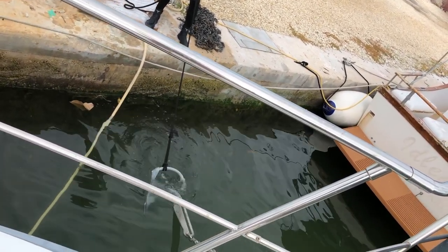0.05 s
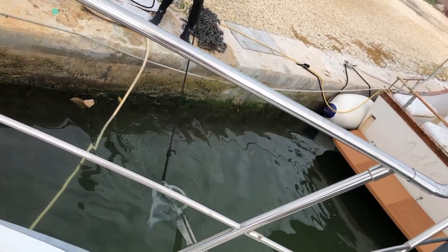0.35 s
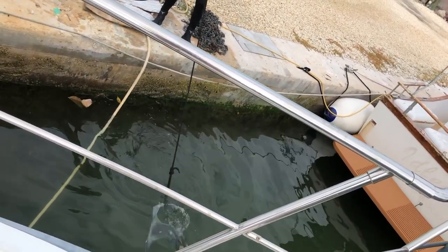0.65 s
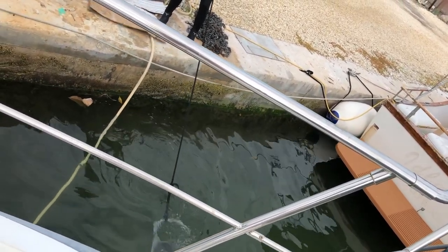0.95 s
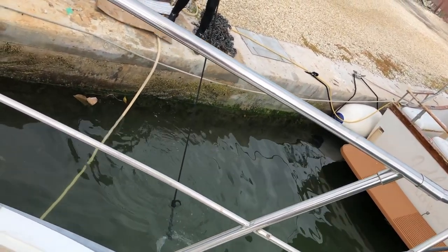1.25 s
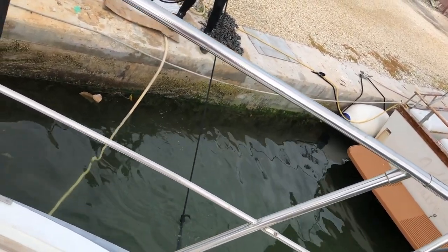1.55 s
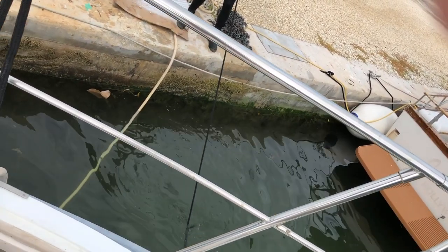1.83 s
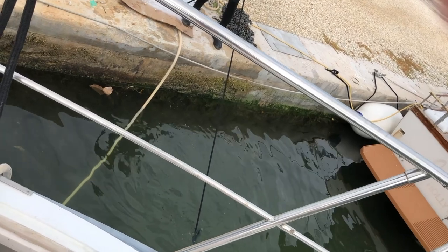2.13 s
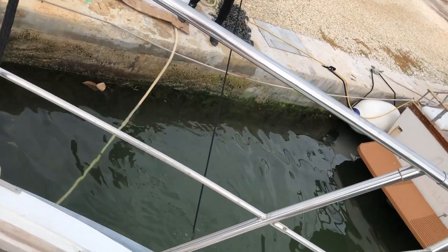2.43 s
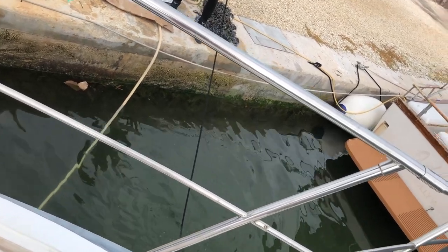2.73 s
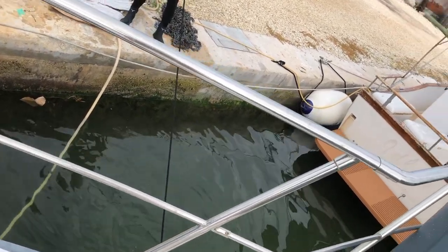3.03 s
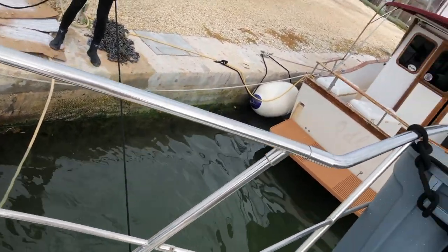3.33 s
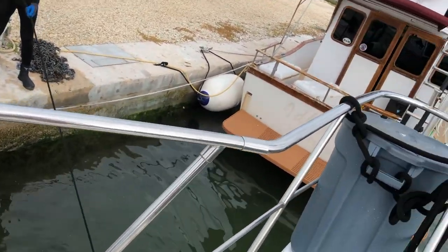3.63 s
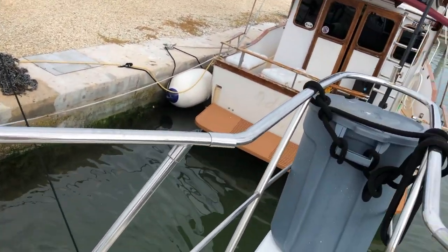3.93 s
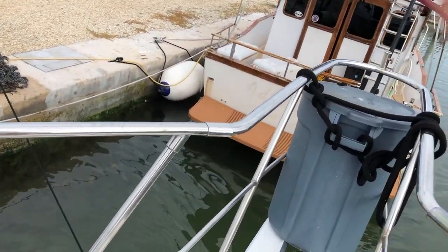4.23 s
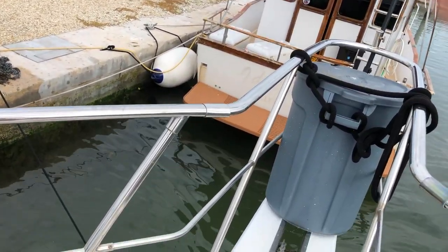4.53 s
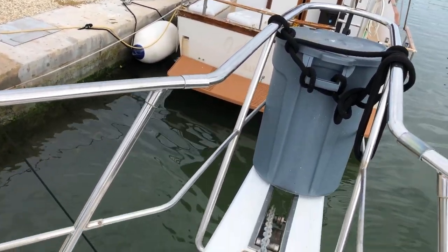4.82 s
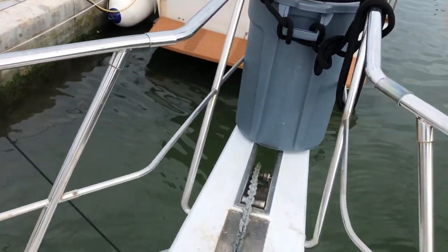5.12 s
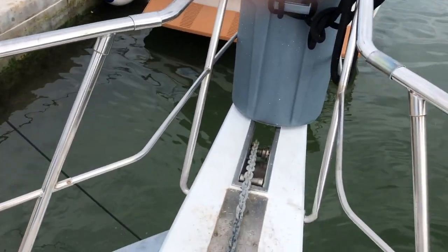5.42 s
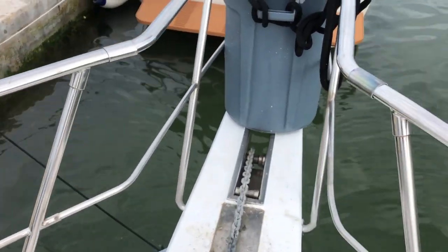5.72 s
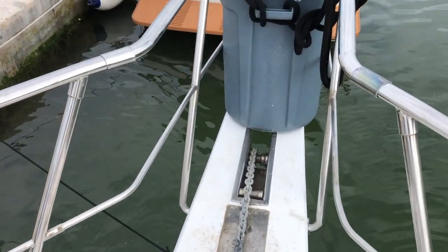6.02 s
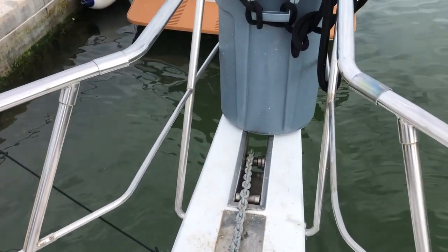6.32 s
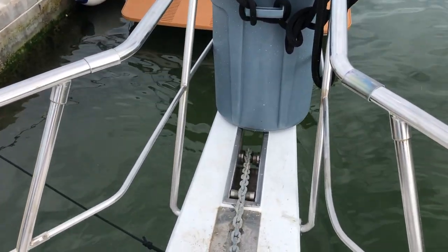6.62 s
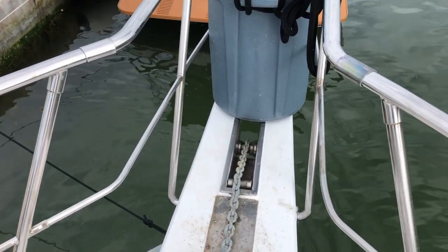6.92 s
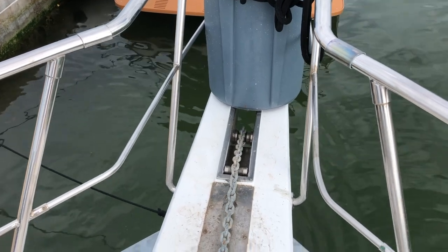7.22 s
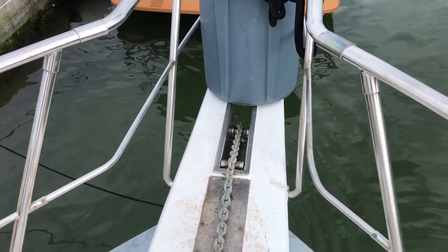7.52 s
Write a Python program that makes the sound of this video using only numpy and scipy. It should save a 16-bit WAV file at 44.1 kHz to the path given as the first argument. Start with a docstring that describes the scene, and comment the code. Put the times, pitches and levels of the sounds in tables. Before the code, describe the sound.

Anchor chain grinds and clatters over a boat's steel roller in three runs, with a low motor hum and rumbling deck.

```python
"""On the bow of a moored boat, one microphone close to an electric windlass paying out anchor chain.
Faint harbour noise lies far behind three runs: the first is already under way, the others start with
a clack. The motor hums, links hiss and grind round the drum, knock over the steel roller and set the
hollow deck rumbling. After each run the drive coasts down and the chain comes to rest."""
import sys
import numpy as np
from scipy import signal
from scipy.fft import rfft, irfft
from scipy.io import wavfile

SR = 44100
rng = np.random.default_rng(int(sys.argv[2]) if len(sys.argv) > 2 else 0)


def int16_out(signal):
    """Quantize to a 16-bit WAV file."""
    q = np.round(np.clip(np.atleast_2d(signal).T, -1, 1) * 32767)
    wavfile.write(sys.argv[1], SR, q.astype(np.int16))


N = 333396
TIME = np.arange(N) / SR


def from_db(db):
    """Decibels to gain."""
    return 10 ** (np.asarray(db) / 20)


def rms_one(x):
    """Scale to unit power."""
    return x / np.sqrt(np.mean(x ** 2) + 1e-20)


def drift(per_s):
    """A random wander through per_s new values a second; rms 1."""
    knots = rng.standard_normal(8192)
    return rms_one(np.interp(TIME * per_s, np.arange(len(knots)), knots))


def coloured(x, spectrum, size=8192):
    """Causal (minimum-phase) filter with the given spectrum; white noise keeps its power."""
    hz, db = np.transpose(spectrum)
    log_hz = np.log(np.maximum(np.arange(size // 2 + 1) * SR / size, 1))
    gain = from_db(np.interp(log_hz, np.log(hz), db))
    cepstrum = irfft(np.log(gain))
    cepstrum[1:size // 2] *= 2
    cepstrum[size // 2 + 1:] = 0
    response = irfft(np.exp(rfft(cepstrum)))
    return signal.fftconvolve(x, response / np.linalg.norm(response))[:N]


def resonance(x, hz, width_hz):
    """Two-pole resonance with gain 1 at its peak."""
    radius = np.exp(-np.pi * width_hz / SR)
    feedback = [1, -2 * radius * np.cos(2 * np.pi * hz / SR), radius ** 2]
    return signal.lfilter(np.array([1, 0, -1]) * (1 - radius ** 2) / 2, feedback, x)


def body(x, modes, tuning=1):
    """A solid body passes the sound on with a few modes standing out."""
    return x + sum(from_db(db) * resonance(x, hz * tuning, width) for hz, width, db in modes)


def dying(power, t60):
    """Each impulse of power decays by 60 dB in t60 seconds."""
    return signal.lfilter([1], [1, -from_db(-60 / (t60 * SR)) ** 2], power + 1e-18)


def chatter(times, level_db, rise_s, t60, tail_db, tail_t60):
    """A blow is a burst of tiny contacts that swells, dies fast and leaves a weaker shiver."""
    power = np.zeros(N)
    power[np.clip(np.round(times * SR).astype(int), 0, N - 1)] = from_db(level_db) ** 2
    envelope = np.sqrt(dying(power, t60) + from_db(tail_db) ** 2 * dying(power, tail_t60))
    lag = np.exp(-1 / (rise_s * SR))
    return signal.lfilter([1 - lag], [1, -lag], envelope) * rng.standard_normal(N)


def rattle(per_s, spread_db, t60, rub_db):
    """Many small contacts of uneven strength at random moments, over steady rubbing; rms 1."""
    contacts = rng.random(N) < per_s / SR
    strength = from_db(spread_db * np.clip(rng.standard_normal(N), -2, 2))
    power = dying(contacts * strength ** 2, t60)
    envelope = np.sqrt(power / power.mean() + from_db(rub_db) ** 2)
    return rms_one(envelope * rng.standard_normal(N))


def pings(times, level_db, low_hz, high_hz, t60, mode_count):
    """Each contact falls at another spot, so it wakes its own few short modes."""
    out = np.zeros(N + SR)
    age = np.arange(int(min(t60, .5) * SR)) / SR
    envelope = from_db(-60 * age / t60) * (1 - np.exp(-age * low_hz))
    for s, db, (pitch, phase) in zip(times, level_db, rng.random((len(times), 2, mode_count))):
        hz = low_hz * (high_hz / low_hz) ** pitch
        modes = np.sin(2 * np.pi * (hz[:, None] * age + phase[:, None])).sum(0)
        start = int(max(s, 0) * SR)
        out[start:start + len(age)] += from_db(db) * envelope * modes / np.sqrt(mode_count)
    return out[:N]


def jostle(low_hz, high_hz, t60, spread_db, count):
    """Loose links touch at random moments; rms 1."""
    moment, strength = rng.random((count, 2)).T
    return rms_one(pings(moment * TIME[-1], spread_db * strength, low_hz, high_hz, t60, mode_count=2))


# The harbour, far from the microphone. Each row: frequency in Hz, relative level in dB.
HARBOUR_SPECTRUM = [(15, -57), (25, -29), (46, -20), (69, -10), (86, -17.5), (243, -23.5), (335, -26),
                    (3010, -53), (8550, -49), (15000, -74)]

def harbour():
    """The distant harbour arrives as a faint, steady, low noise."""
    return from_db(-52.5) * coloured(rng.standard_normal(N), HARBOUR_SPECTRUM)


# The foredeck under the microphone. Each row: frequency in Hz, relative level in dB.
DECK_SPECTRUM = [(59, -36), (100, -6.5), (178, -4), (344, 0.5), (483, -3), (541, -2), (751, -5.5),
                 (911, -5.5), (1500, -15.5), (1950, -33), (3300, -120)]
# Its hollow modes. Each row: frequency in Hz, width in Hz, gain in dB.
DECK_MODES = [(271, 6.4, -6), (321, 6.4, -7.5), (353.4, 7.3, -5.5), (415, 16, -15.5), (530, 39, -1),
              (577, 31, -18), (985, 66, -17)]

def deck(force):
    """The foredeck answers every force with a hollow low sound."""
    return body(coloured(force, DECK_SPECTRUM), DECK_MODES)


# The boom of the hull, further below. Each row: frequency in Hz, relative level in dB.
HULL_SPECTRUM = [(20, -29), (32, -8), (48, -4), (70, -5), (100, 5.5), (135, -3), (200, -8), (400, -49.5)]

def hull_rumble(rumble_db):
    """Chain dragged round the drum shakes and bumps the deck and the hull below it."""
    rumble = deck(from_db(rumble_db) * rattle(per_s=110, spread_db=.5, t60=.023, rub_db=2))
    bumps = from_db(rumble_db - 3.5) * jostle(low_hz=300, high_hz=660, t60=.14, spread_db=7, count=300)
    boom = from_db(rumble_db - 3.3) * coloured(rng.standard_normal(N), HULL_SPECTRUM)
    return rumble + bumps + boom


# Chain slipping at the bow. Each row: start in seconds, relative level in dB, fade time in seconds.
SCRAPES = [(3.21, -41, 0.063), (5.555, -58, 0.025), (5.592, -55, 0.021), (5.625, -54.5, 0.048),
           (6.903, -40, .05)]
# Its bright grit, heard close. Each row: frequency in Hz, relative level in dB.
SCRAPE_SPECTRUM = [(1500, -33), (3000, -8), (4200, 0), (6200, 3), (8800, 3), (10500, -12), (15000, -22)]

def scrapes():
    """Short slides of chain over steel swell and fade as gritty noise."""
    envelope = np.zeros(N)
    for s, db, fade_s in SCRAPES:
        age = np.clip((TIME - s) / fade_s, 0, 4)
        envelope += from_db(db + 5) * (1 - np.exp(-6 * age)) * np.exp(-age ** 2)
    return envelope * coloured(rattle(per_s=600, spread_db=3, t60=.008, rub_db=-2), SCRAPE_SPECTRUM)


# Links ringing on, or creaking the bow roller.
# Each row: start in seconds, pitch in Hz, relative level in dB, fade time in seconds.
RINGS = [(.166, 9100, -29, .039), (.89, 4870, -26, .012), (1.025, 4890, -24, .03), (1.2, 3960, -25, .013),
         (1.379, 4150, -26, .016), (1.58, 4020, -26, .015), (1.868, 4070, -28, .009),
         (2.184, 310, -29, .015), (2.405, 130, -47, .06), (2.752, 488, -33, .025), (2.775, 543, -36, .042),
         (4.968, 2690, -36, .02), (5.134, 4750, -44, .027), (5.44, 3200, -55, .024), (5.2, 1470, -50, .18),
         (5.31, 1000, -50, .23), (6.269, 272, -28, .032), (7.31, 303, -26, .023)]
# A link squeaks, twisting against its neighbour. Each row: start in seconds, relative level in dB.
SQUEAKS = [(1.52, -37), (3.215, -29.5), (3.805, -34), (3.976, -32), (4.342, -29), (4.685, -36)]
# The thin whistle of sliding steel. Each row: start in seconds, relative level in dB.
WHISTLES = [(.085, -45), (.785, -41), (3.49, -44), (3.76, -45), (4.47, -44), (5.58, -60), (6.875, -44)]
SQUEAK_LOW_HZ, SQUEAK_HIGH_HZ, SQUEAK_FADE_S = 7200, 9480, .042
WHISTLE_HZ, WHISTLE_FADE_S = 15080, .052

def ringing_links():
    """A rubbed link sounds its modes; uneven rubbing makes them flutter in strength and pitch."""
    out = np.zeros(N)
    waver = drift(500)
    flutter = rms_one(from_db(4.5 * drift(300)))
    low_squeaks = [(s, SQUEAK_LOW_HZ, db - 2, SQUEAK_FADE_S) for s, db in SQUEAKS]
    high_squeaks = [(s, SQUEAK_HIGH_HZ, db, SQUEAK_FADE_S) for s, db in SQUEAKS]
    whistles = [(s, WHISTLE_HZ, db, WHISTLE_FADE_S) for s, db in WHISTLES]
    for s, hz, db, fade_s in [*RINGS, *low_squeaks, *high_squeaks, *whistles]:
        span = slice(int(s * SR), int((s + 3 * fade_s) * SR))
        age = np.arange(len(TIME[span])) / (fade_s * SR)
        envelope = (1 - np.exp(-9 * age)) * np.exp(-1.3 * age ** 2)
        phase = 2 * np.pi * np.cumsum(hz + .85 * np.sqrt(hz) * waver[span]) / SR
        out[span] += from_db(db + 2.5) * envelope * np.sin(phase)
    return out * flutter


# The runs of the windlass beside the microphone. Each row: switch-on, switch-off, chain at rest and
# take-up time in seconds; base levels of rumble, grinding and hum in dB; loss from slack chain in dB.
RUNS = [(-2.0, 1.3, 2.1, .1, -35.2, -37.5, -37.3, 3.3), (2.7187, 4.64, 5.33, .14, -35.5, -38.5, -37.7, 22),
        (6.0254, 6.93, 7.6, .03, -38, -39.5, -38, 9)]
TOP_HZ, SPIN_UP_S, COAST_S = 81, .4, 2.2  # top turns a second; time constants of power and friction
HISS_DB, HISS_SPEED_POWER, GRIND_SPEED_POWER = -37.6, 2.2, 1.5  # amplitude follows speed to this power
HUM_FADE_DB_PER_S, RUMBLE_FADE_DB_PER_S, GRIND_FADE_DB_PER_S = 18, 7, 8  # while coasting
SLACKEN_S, SETTLE_DB_PER_S = .8, 75  # tension goes after switch-off; fade once the chain is at rest
TAUT_RUB_DEPTH, SLACK_RUB_DEPTH = .1, .22  # the drum rubs once a turn; slack adds to the depth

def windlass_motion():
    """The drive spins up under power and coasts on friction; rub depth and levels follow each run."""
    speed, rub_depth, hum_db, hiss_db, grind_db, rumble_db = np.zeros((6, N))
    for on, off, rest, take_up_s, deck_db, chain_db, motor_db, slack_db in RUNS:
        run = TIME >= on
        t = TIME[run]
        powered_s = np.minimum(t, off) - on
        coasting_s = np.maximum(t - off, 0)
        powered_hz = TOP_HZ - (TOP_HZ - speed[run][0]) * np.exp(-powered_s / SPIN_UP_S)
        speed[run] = powered_hz * np.exp(-coasting_s / COAST_S)
        pace_db = 20 * np.log10(speed[run] / TOP_HZ)
        slack = np.minimum(coasting_s / SLACKEN_S, 1)
        taken_up_db = 20 * np.log10(np.clip((t - on) / take_up_s, 1e-3, 1))
        settled_db = SETTLE_DB_PER_S * np.maximum(t - rest, 0)
        rub_depth[run] = TAUT_RUB_DEPTH + SLACK_RUB_DEPTH * slack ** 4
        hum_db[run] = motor_db - HUM_FADE_DB_PER_S * coasting_s
        hiss_db[run] = HISS_DB + HISS_SPEED_POWER * pace_db - slack_db * slack
        grind_db[run] = (chain_db + GRIND_SPEED_POWER * pace_db + taken_up_db
                         - GRIND_FADE_DB_PER_S * coasting_s - np.minimum(settled_db, slack_db))
        rumble_db[run] = deck_db + 2 * taken_up_db - RUMBLE_FADE_DB_PER_S * coasting_s - settled_db
    return speed, rub_depth, hum_db, hiss_db, grind_db, rumble_db


# Small ticks of the idle drive, close by. Each row: start in seconds, level in dB.
IDLE_TICKS = [(5.4865, -34), (5.9735, -41)]
# The dry colour of its ticks and clacks. Each row: frequency in Hz, relative level in dB.
CLACK_SPECTRUM = [(700, -11.5), (2200, -8), (3200, -10.5), (4800, -10), (6500, -9.5), (8400, 1.5),
                  (9600, -4.5), (11000, -14), (13500, -18), (16000, -25)]

def drive_clacks(engage_db=-16, sizzle_db=-29):
    """The drive ticks when idle, engages with a dry crack and sizzles briefly as it takes load."""
    starts = np.array([on for on, *_ in RUNS if on > 0])
    times, crack_db = np.transpose([*IDLE_TICKS, *[(on, engage_db) for on in starts]])
    crack = chatter(times, crack_db, rise_s=.002, t60=.013, tail_db=-30, tail_t60=.05)
    sizzle = chatter(starts, sizzle_db, rise_s=.0037, t60=.2, tail_db=-30, tail_t60=.3)
    return coloured(crack + sizzle, CLACK_SPECTRUM)


def motor_hum(speed, angle, hum_db, from_hz=62, range_hz=18):
    """Imbalance shakes the motor once a turn; the hum sets in as it nears top speed."""
    onset = np.clip((speed - from_hz) / range_hz, 0, 1)
    return from_db(hum_db + 3 * drift(14)) * onset * np.sqrt(2) * np.sin(angle)


# The steel of links and bow roller. Each row: frequency in Hz, width in Hz, gain in dB.
STEEL_MODES = [(2350, 260, -7), (3650, 160, -3), (4080, 80, 1), (4893, 60, 4), (7750, 150, -3),
               (8550, 140, -2), (9100, 130, -2), (9470, 70, 1)]

def steel(force, tuning=1):
    """Links and roller ring at their modes when struck or rubbed."""
    return body(force, STEEL_MODES, tuning)


# Hiss and grinding at the drum, near the microphone. Each row: frequency in Hz, relative level in dB.
HISS_SPECTRUM = [(700, -11), (2000, -7), (4500, -6), (6300, -6.5), (7500, -4.5), (8800, 2.5), (9800, -4.5),
                 (11000, -12), (12500, -17.5), (15500, -24)]
GRIND_SPECTRUM = [(500, -3.5), (950, 2.5), (1400, 3), (2000, -1), (2500, -3), (3100, 0.5), (3700, -1),
                  (4300, -8.5), (4950, -6), (6000, -14.5), (7500, -7), (11000, -20.5)]

def chain_on_drum(angle, rub_depth, hiss_db, grind_db):
    """Links clink, hiss and grind as they slide round the drum; the rubbing swells once a turn."""
    hiss = from_db(hiss_db) * coloured(rattle(per_s=150, spread_db=2, t60=.012, rub_db=6.5), HISS_SPECTRUM)
    grit = coloured(rattle(per_s=170, spread_db=8, t60=.04, rub_db=3.6), GRIND_SPECTRUM)
    grind = from_db(grind_db) * (.65 * grit + .33 * steel(grit))
    contacts = jostle(low_hz=850, high_hz=5400, t60=.022, spread_db=14, count=1000)
    clinks = from_db(grind_db - 3) * contacts * np.clip(1 - 2 * rub_depth, 0, 1)
    return (1 + rub_depth * np.sin(angle)) * (hiss + grind) + clinks


def light_knocks(grind_db, rumble_db, count=70, spread_db=2):
    """Swinging links tap the roller at random while the chain moves; rows as in HARD_KNOCKS."""
    times = (np.arange(count) + rng.random(count)) / count * TIME[-1]
    force_db = spread_db * np.clip(rng.standard_normal(count), -2, 2)
    click_db = force_db + np.interp(times, TIME, grind_db)
    clank_db = click_db + 4.5
    thud_db = force_db + np.interp(times, TIME, rumble_db)
    return np.transpose([times, click_db, clank_db, thud_db])


# Links striking drum and roller right by the microphone, one link about every .17 s at top speed.
# Each row: start in seconds, then relative levels of bright click, roller clank and deck thud in dB.
HARD_KNOCKS = [(0.002, -29.5, -26.5, -19.5), (0.0963, -16.5, -29.0, -45.0), (0.122, -24.0, -25.5, -20.0),
               (0.165, -14.5, -21.0, -20.0), (0.1934, -24.0, -28.5, -25.5), (0.2692, -19.5, -28.0, -45.0),
               (0.3033, -38.5, -29.5, -45.0), (0.32, -29.0, -26.5, -29.0), (0.3395, -25.0, -25.0, -21.0),
               (0.4456, -23.0, -27.5, -25.5), (0.5215, -28.5, -28.0, -30.5), (0.62, -16.0, -24.0, -29.5),
               (0.653, -28.5, -24.0, -27.5), (0.6863, -18.0, -21.0, -25.0), (0.776, -19.5, -27.0, -22.5),
               (0.7888, -18.5, -26.5, -45.0), (0.8385, -24.5, -22.0, -24.5), (0.8924, -36.0, -25.5, -28.5),
               (0.9114, -30.5, -30.5, -23.5), (0.9606, -23.5, -29.0, -45.0), (1.0026, -27.0, -23.5, -29.5),
               (1.027, -18.5, -22.0, -22.0), (1.0445, -20.5, -24.0, -26.0), (1.1303, -15.5, -23.5, -23.5),
               (1.1714, -29.0, -27.5, -45.0), (1.2006, -23.0, -22.5, -21.5), (1.2405, -30.5, -23.5, -21.0),
               (1.3054, -14.5, -25.0, -43.5), (1.35, -25.5, -22.0, -30.5), (1.3783, -19.0, -21.0, -20.5),
               (1.398, -45.0, -38.0, -22.0), (1.491, -17.0, -33.0, -45.0), (1.5368, -28.5, -30.0, -45.0),
               (1.5802, -17.5, -22.0, -21.5), (1.6003, -39.5, -27.5, -20.5), (1.7295, -26.5, -32.5, -45.0),
               (1.8084, -42.0, -31.0, -45.0), (1.8686, -29.5, -30.5, -28.5), (1.9035, -36.5, -30.5, -26.0),
               (2.025, -45.0, -42.0, -28.0), (2.078, -34.5, -33.5, -27.0), (2.8627, -33.0, -28.5, -22.5),
               (2.998, -26.5, -32.0, -34.5), (3.0498, -31.0, -30.5, -45.0), (3.207, -18.5, -27.5, -32.0),
               (3.2554, -38.0, -29.0, -40.0), (3.2847, -30.5, -32.5, -24.0), (3.4005, -24.0, -31.0, -38.5),
               (3.443, -23.0, -24.5, -27.5), (3.4713, -27.0, -27.0, -23.5), (3.5766, -20.5, -28.0, -31.5),
               (3.6855, -24.5, -28.0, -25.5), (3.7513, -32.0, -30.0, -36.5), (3.8227, -18.0, -25.0, -24.5),
               (3.929, -18.5, -32.5, -27.5), (3.9762, -23.0, -26.5, -30.5), (3.9948, -20.0, -25.5, -23.5),
               (4.105, -17.5, -27.0, -45.0), (4.1724, -24.5, -26.0, -21.0), (4.28, -21.5, -29.0, -45.0),
               (4.3215, -37.0, -28.0, -44.5), (4.3469, -19.0, -25.0, -24.5), (4.4504, -13.0, -25.5, -32.0),
               (4.4927, -36.0, -26.0, -45.0), (4.519, -28.0, -26.5, -22.0), (4.6253, -18.5, -27.5, -45.0),
               (4.6682, -28.0, -26.0, -29.0), (4.6946, -27.0, -29.0, -25.5), (4.8247, -19.0, -33.0, -31.5),
               (5.018, -32.5, -36.0, -30.5), (6.049, -42.0, -36.0, -28.0), (6.086, -35.5, -35.5, -26.0),
               (6.1243, -32.0, -37.5, -30.0), (6.2356, -35.5, -30.0, -29.0), (6.2698, -35.0, -31.5, -22.5),
               (6.4045, -25.0, -29.5, -40.5), (6.4525, -33.0, -31.0, -29.5), (6.514, -37.5, -36.0, -24.5),
               (6.542, -20.0, -25.5, -45.0), (6.603, -21.0, -28.0, -35.5), (6.6724, -23.5, -28.0, -31.0),
               (6.7374, -19.5, -25.5, -30.0), (6.7859, -20.0, -29.5, -31.5), (6.8552, -25.0, -28.5, -30.0),
               (6.9037, -22.5, -28.0, -31.0), (6.971, -25.5, -29.0, -27.5), (7.1311, -27.0, -28.5, -29.0),
               (7.1586, -25.5, -28.5, -28.5), (7.2196, -27.0, -38.5, -27.0), (7.32, -35.5, -34.0, -24.0),
               (7.4853, -34.5, -40.0, -32.0)]
# The colours of click and clank. Each row: frequency in Hz, relative level in dB.
CLICK_SPECTRUM = [(900, -31), (3000, -28), (4900, -9), (6000, -15.5), (7000, -15), (7800, -3.5),
                  (9100, -1.5), (9900, -6), (10800, -13.5), (12300, -27), (13500, -19), (16000, -29)]
CLANK_SPECTRUM = [(300, -22.5), (800, 0.5), (1300, 1.5), (1900, -2), (2400, 1), (3000, -1.5), (4100, -1),
                  (5100, -1.5), (6000, -5), (7500, -3), (11000, -51.5)]

def chain_knocks(grind_db, rumble_db, tunings=(.992, 1, 1.008)):
    """A link dropping on steel clicks, clanks the roller and thuds into the deck."""
    times, click_db, clank_db, thud_db = np.vstack([HARD_KNOCKS, light_knocks(grind_db, rumble_db)]).T
    out = deck(chatter(times, thud_db, rise_s=.005, t60=.12, tail_db=-14, tail_t60=.44))
    out += pings(times, clank_db + 2, low_hz=2100, high_hz=5500, t60=.026, mode_count=7)
    for k, tuning in enumerate(tunings):  # links differ a little in pitch
        rows = slice(k, None, len(tunings))
        click = chatter(times[rows], click_db[rows], rise_s=.00067, t60=.029, tail_db=-17, tail_t60=.17)
        clank = chatter(times[rows], clank_db[rows], rise_s=.00072, t60=.038, tail_db=-9, tail_t60=.18)
        out += steel(coloured(click, CLICK_SPECTRUM) + coloured(clank, CLANK_SPECTRUM), tuning)
    return out


def scene():
    """Harbour, drive and chain reach one microphone on the bow, the same in both channels."""
    speed, rub_depth, hum_db, hiss_db, grind_db, rumble_db = windlass_motion()
    mono = harbour()
    angle = 2 * np.pi * np.cumsum(speed * (1 + .005 * drift(23))) / SR  # the drive turns a bit unevenly
    mono += motor_hum(speed, angle, hum_db)
    mono += chain_on_drum(angle, rub_depth, hiss_db, grind_db)
    mono += drive_clacks()
    mono += hull_rumble(rumble_db)
    mono += chain_knocks(grind_db, rumble_db) + scrapes() + ringing_links()
    return np.array([mono, mono])


def record(dry, low_cut_hz=31, high_cut_hz=15900):
    """The microphone signal loses its deepest bass and is cut steeply at the top."""
    low_cut = signal.butter(5, low_cut_hz, "high", fs=SR, output="sos")
    high_cut = signal.ellip(10, .2, 80, high_cut_hz, fs=SR, output="sos")
    return signal.sosfilt(high_cut, signal.sosfilt(low_cut, dry))


dry = scene()
out = record(dry)
int16_out(out)
```